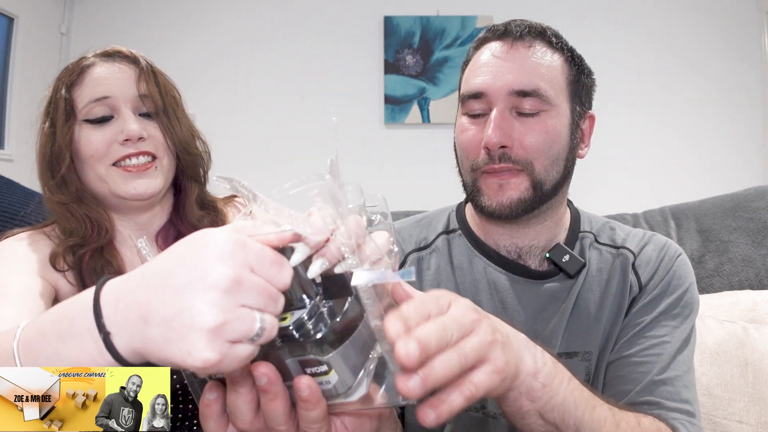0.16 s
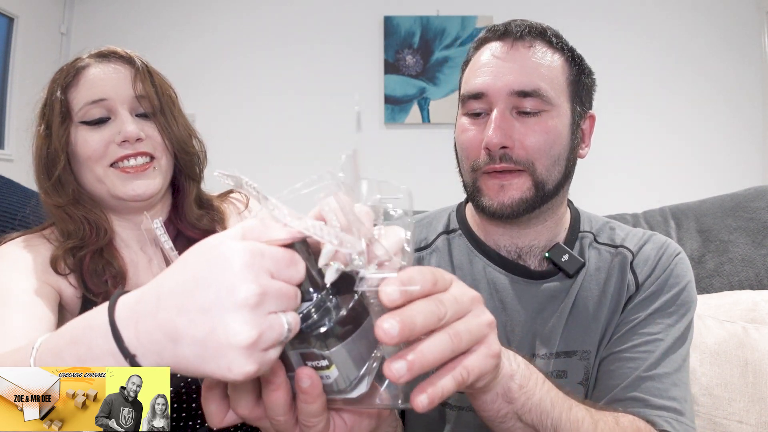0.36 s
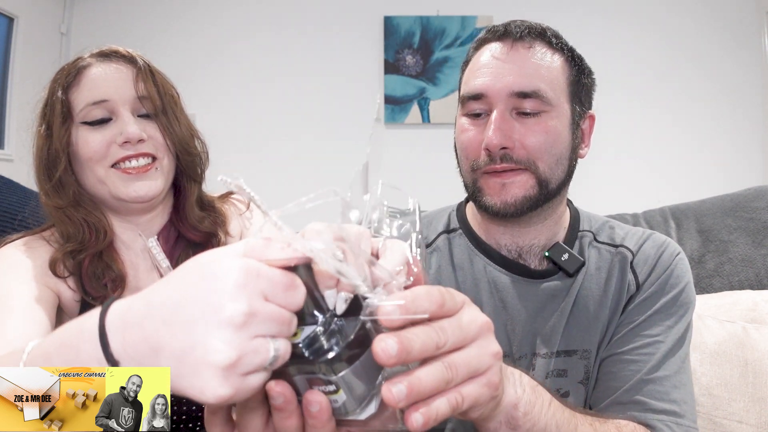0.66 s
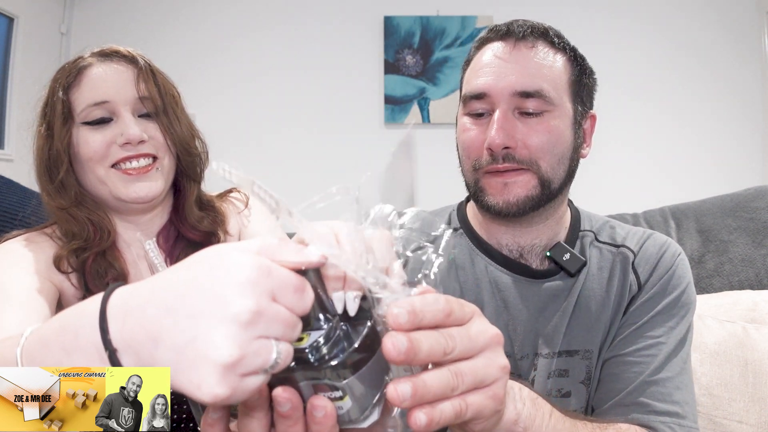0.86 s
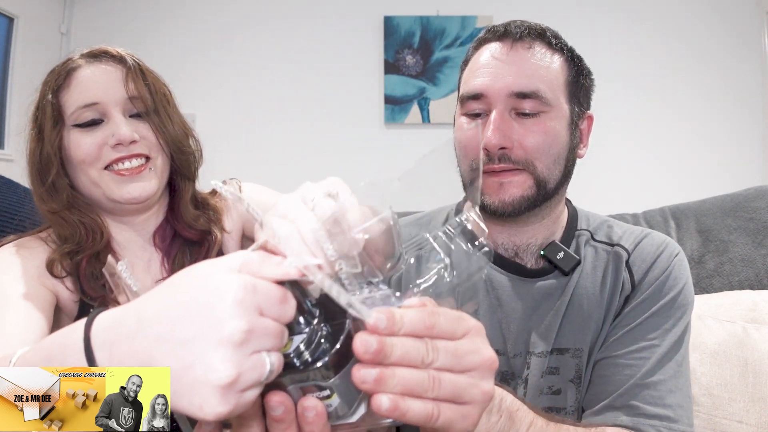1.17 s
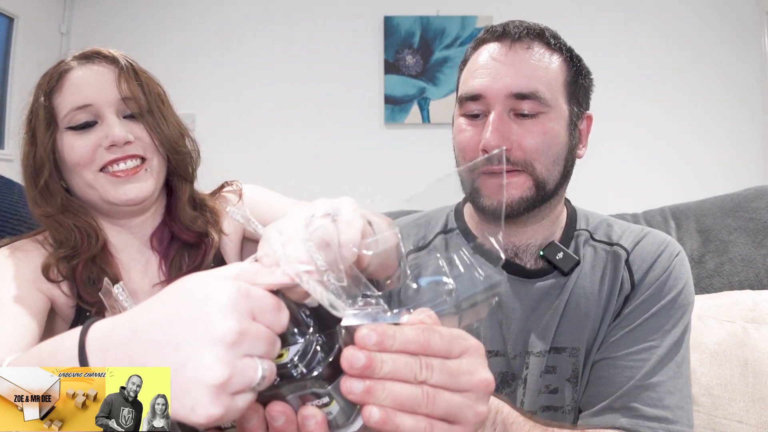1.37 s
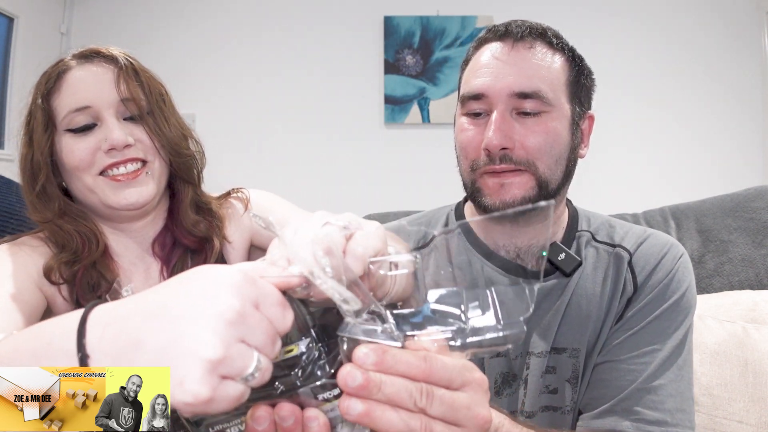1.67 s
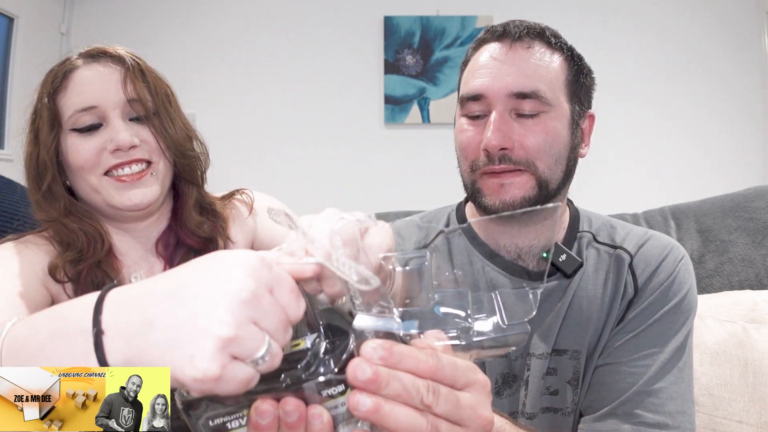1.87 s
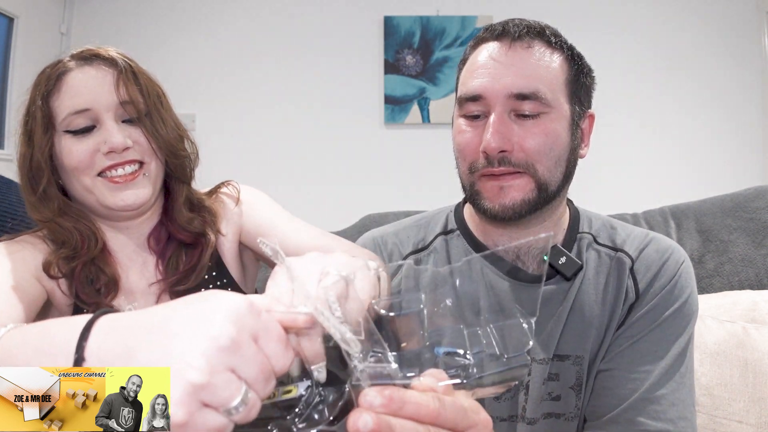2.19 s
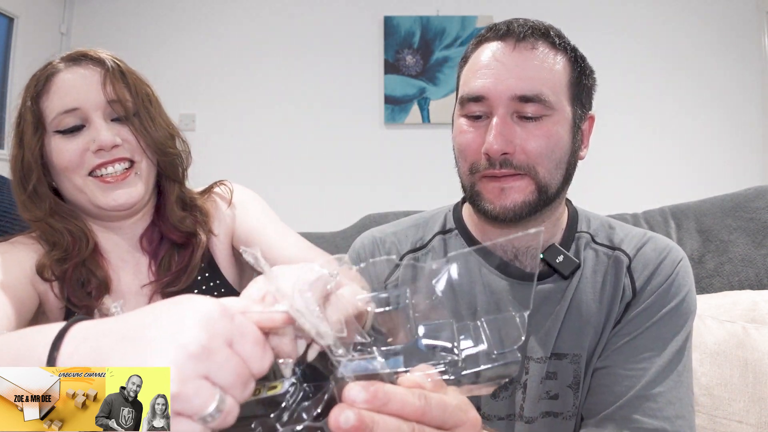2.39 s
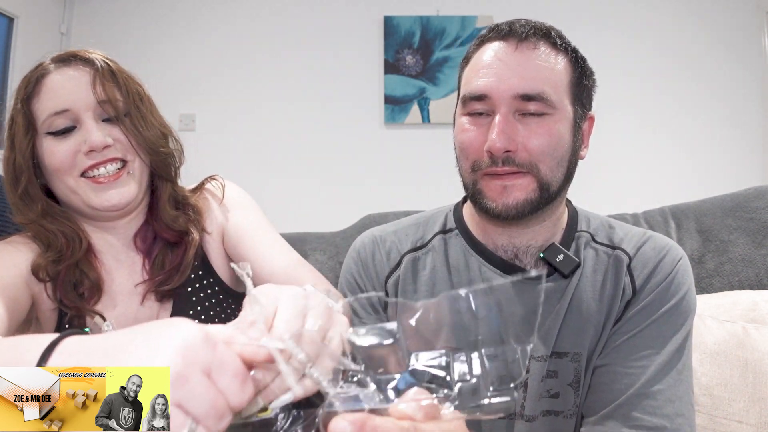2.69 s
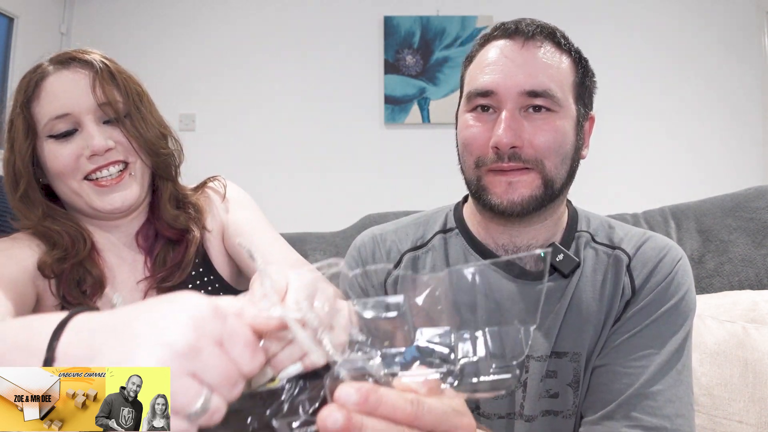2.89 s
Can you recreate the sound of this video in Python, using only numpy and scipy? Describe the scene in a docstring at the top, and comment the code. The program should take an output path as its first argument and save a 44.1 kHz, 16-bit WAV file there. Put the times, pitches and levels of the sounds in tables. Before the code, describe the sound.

Stiff plastic packaging crinkles and snaps as hands pull it apart, close by in a quiet room. Light snaps start it, with a short crumple at 0.4 seconds and a louder one with a dull bump at 0.9. After a lull, dense crackling runs from 1.5 to 1.8 seconds. The sharpest crack comes at 2.3, followed by scattered snaps, a strong one at 2.7, thinning out by 3 seconds.

```python
"""A living room: hands pull a stiff clear plastic blister pack apart, close to a microphone.
Bent panels buckle and release their elastic energy as single dry snaps, or as short crumples of dense
tiny cracks. Fine crackle and sharp ticks run on between, and the hands bump the pack with dull thuds.
Each crack sets the thin shell ringing faintly in its modes, and the quiet room reverberates."""
import sys
import numpy as np
from scipy import signal
from scipy.fft import rfft, irfft, next_fast_len
from scipy.io import wavfile
from scipy.ndimage import map_coordinates

SR = 44100
rng = np.random.default_rng(int(sys.argv[2]) if len(sys.argv) > 2 else 0)


def persist_wave(psi):
    """Save psi, clipped to +-1, as 16-bit WAV."""
    counts = np.round(np.clip(psi, -1, 1) * 32767).astype(np.int16)
    wavfile.write(sys.argv[1], SR, np.atleast_2d(counts).T)


N = 134505

# Levels are relative within each table.
# fine crackle under the bending: time_s, level_db
CRACKLE_ENVELOPE = [(0, -45.5), (.15, -47.5), (.38, -35), (.52, -52), (0.629, -62), (0.709, -33.5),
                    (.85, -52), (1.05, -50), (1.21, -59), (1.3, -43.5), (1.42, -47), (1.54, -35.5),
                    (1.82, -36.5), (1.88, -73), (1.943, -34), (2.07, -60), (2.18, -46), (2.29, -29.5),
                    (2.42, -33), (2.58, -71), (2.919, -45.5), (3.05, -47)]
# background noise of the quiet room: frequency_hz, level_db
AIR_SPECTRUM = [(50, -42), (90, 16), (200, 10.5), (1000, -4), (4000, -35), (15000, -62)]
# modes of the shell: frequency_hz, level_db
SHELL_MODES = [(440, -9), (698, 1.5), (785, 5.5), (857, 1), (1010, -9.5), (1222, 5), (1324, 6), (1946, 3.5),
               (2288, 4), (2805, 2), (3111, 0.5)]
# reverberation time of the room: frequency_hz, t60_s
ROOM_DECAY = [(400, 0.2), (1000, 0.36), (3000, 0.22), (15000, 0.15)]
# spectrum of the reflections: frequency_hz, level_db
ROOM_SPECTRUM = [(100, -3.5), (400, 3.5), (1000, -6), (3000, 0), (7000, 4), (15000, -1.5)]
# sharp creases: start_s, level_db
CREASE_TICKS = [(0.044, -43), (0.1, -40), (0.131, -44), (0.743, -45.5), (0.766, -47), (1.09, -47.5),
                (1.408, -50.5), (1.446, -51), (1.494, -36), (1.658, -46)]
# panels buckling: start_s, level_db, pitch_hz, high_edge_hz, tick_db
PANEL_SNAPS = [(0.1447, -33, 1410, 5350, -63), (0.1681, -28, 1400, 5360, -44.5),
               (0.2007, -26.5, 870, 1770, -38), (0.2312, -27, 1330, 3240, -53),
               (0.4059, -20.5, 3130, 3850, -44), (0.513, -22, 2160, 4860, -41),
               (0.5482, -32.5, 2430, 3120, -42.5), (0.6058, -28.5, 1310, 4200, -43.5),
               (0.6665, -25.5, 1270, 4560, -48), (0.7239, -14.5, 1400, 1620, -62),
               (0.815, -30, 860, 1770, -63), (0.8333, -26, 490, 3140, -41.5), (0.887, -11, 1030, 1930, -37),
               (0.8939, -17.5, 965, 2750, -34), (0.9097, -13.5, 1180, 3980, -32.5),
               (1.1966, -40, 1170, 5060, -60), (1.2603, -27.5, 2250, 3900, -58),
               (1.298, -31, 423, 2580, -40.5), (1.5125, -16, 1410, 2030, -31.5),
               (1.519, -28, 750, 2580, -53), (1.5465, -21, 326, 2850, -53), (1.577, -28, 420, 3280, -35),
               (1.6205, -21, 437, 1470, -33), (1.6484, -32.5, 1460, 5970, -44),
               (1.6681, -28, 1680, 5900, -34.5), (1.7186, -15.5, 2150, 2420, -31),
               (1.7474, -23.5, 455, 8600, -33.5), (1.7578, -18, 465, 2080, -40),
               (1.7765, -25.5, 1050, 2980, -39), (1.8056, -16.5, 1020, 2240, -32.5),
               (1.9055, -27, 880, 2140, -50.5), (1.951, -41, 805, 2790, -42.5),
               (2.011, -34, 1530, 6750, -34), (2.133, -32, 393, 545, -54), (2.2046, -31.5, 2630, 8300, -42),
               (2.3324, -5.5, 2560, 3350, -21.5), (2.345, -22.5, 1490, 3430, -38),
               (2.4091, -21, 940, 3440, -38), (2.4276, -24.5, 960, 3700, -48),
               (2.4505, -17.5, 633, 915, -45), (2.5368, -17, 756, 1800, -39),
               (2.597, -29.5, 960, 1980, -46), (2.6725, -27, 4350, 5460, -37.5),
               (2.6947, -11, 925, 2240, -35), (2.7727, -18.5, 930, 1590, -36.5),
               (2.9029, -30, 756, 760, -49)]
# runs of tiny cracks: peak_s, rise_s, fall_s, level_db, low_edge_hz, pitch_hz, high_edge_hz, tick_db
FOLD_CRUMPLES = [(0.408, 0.018, 0.066, -16.5, 840, 1060, 3500, -58),
                 (0.728, 0.015, 0.014, -19.5, 575, 1190, 1410, -68),
                 (0.908, 0.037, 0.078, -22.5, 606, 1200, 1930, -43),
                 (0.926, 0.066, 0.08, -28, 2490, 2750, 2900, -56),
                 (1.106, 0.015, 0.015, -38.5, 3170, 3970, 4430, -65),
                 (1.254, 0.025, 0.053, -33.5, 1060, 2400, 5600, -40.5),
                 (1.487, 0.019, 0.051, -23, 1160, 1950, 4900, -45),
                 (1.588, 0.0081, 0.039, -21.5, 795, 1380, 2870, -33.5),
                 (1.735, 0.02, 0.1, -41, 347, 1010, 2400, -61),
                 (2.011, 0.036, 0.076, -35.5, 1280, 1590, 5700, -37),
                 (2.33, 0.066, 0.036, -23.5, 470, 1260, 2540, -34),
                 (2.353, 0.0072, 0.1, -28, 890, 2280, 3430, -42.5),
                 (2.517, 0.024, 0.063, -33.5, 1300, 3050, 6100, -29)]
# soft pushes of the hands: start_s, level_db
HAND_BUMPS = [(0.208, -46), (0.719, -37.5), (0.886, -30), (1.576, -41.5), (2.698, -52)]
# microphone response: frequency_hz, gain_db
MIC_RESPONSE = [(30, -23), (65, -6), (200, 3.5), (450, 2), (850, 1), (2900, 1.5), (4000, -0.5), (5200, 2.5),
                (7500, -4), (15000, -5.5)]

SLIPS_PER_S = 2200
SNAP_GAIN = np.sqrt(.003 * SR)  # gives one pulse the energy of 3 ms of sound at its level


def amp(db):
    """Amplitude grows tenfold with every 20 dB."""
    return 10 ** (np.asarray(db) / 20)


def unit(x):
    """Normalisation to an rms of 1."""
    return x / np.sqrt(np.mean(x ** 2) + 1e-20)


def along(points, hz):
    """Interpolation of (frequency_hz, value) points on a logarithmic frequency axis."""
    freqs, values = np.transpose(points)
    return np.interp(np.log(hz + 1), np.log(freqs), values)


def filtered(x, response):
    """Linear filtering: the spectrum is multiplied by a frequency response."""
    size = next_fast_len(N + SR // 2)
    return irfft(rfft(x, size) * response(np.fft.rfftfreq(size, 1 / SR)), size)[:N]


def add(track, start_s, sound):
    """Superposition: a sound adds to the track from its start time."""
    start = int(np.clip(round(start_s * SR), 0, N))
    track[start:start + len(sound)] += sound[:N - start]


def swell(t, rise_s, fall_s):
    """Exponential growth and decay about t = 0: 20 dB up per rise_s, 20 dB down per fall_s."""
    return amp(-20 * np.maximum(-t / rise_s, t / fall_s))


def slips(per_s, scatter_db=6):
    """A Poisson process: independent impulses of uneven size, rms 1."""
    sizes = amp(scatter_db * rng.standard_normal(N).clip(-2, 2)) * rng.choice([-1, 1], N)
    return unit(sizes * (rng.random(N) < per_s / SR))


def crack(db, pitch_hz, high_hz, tick_db, edge_hz=0, size=2048):
    """Impulse response of a buckling panel: a resonant band and a tick, dispersed as bending waves."""
    hz = np.fft.rfftfreq(size, 1 / SR) + 1
    low_hz = max(edge_hz, 337 * (pitch_hz / 1000) ** .4)  # small panels radiate little bass
    mode_axis = np.sqrt(hz / hz[-1]) * 44
    lesser_modes = amp(3.5 * map_coordinates(rng.standard_normal(48).clip(-1.5, 1.5), [mode_axis]))
    travel_s = .003015 * map_coordinates(rng.random(48), [mode_axis], order=1)
    delay_s = travel_s * hz / (hz + low_hz) / (1 + (hz / 7560) ** 2)  # the fastest waves arrive together
    q = 3.17 * np.sqrt(pitch_hz / 1000)
    resonance = 1 + (amp(10.5) - 1) / (1 + (q * (hz / pitch_hz - pitch_hz / hz)) ** 2)
    panel_band = ((1 + (low_hz / hz) ** 5.88) * (1 + (hz / high_hz) ** 8.07)) ** -.5
    tick_band = ((1 + (1940 / hz) ** 4) * (1 + (hz / 5800) ** 2)) ** -.5
    body = amp(db) * unit(lesser_modes * resonance * panel_band)
    tick = amp(tick_db + 5) * unit(lesser_modes * tick_band)
    # folding the cepstrum makes the pulse causal, with minimum phase
    cepstrum = irfft(np.log(np.hypot(body, tick) + 1e-6))
    cepstrum[1:size // 2] *= 2
    cepstrum[size // 2 + 1:] = 0
    phase_lag = 2 * np.pi * np.cumsum(delay_s) * SR / size
    return irfft(np.exp(rfft(cepstrum) - 1j * phase_lag))


def crackle(creases_per_s=190):
    """Small creases buckle, each at its own pitch, over the faint friction of sliding sheets."""
    creases = np.zeros(N)
    draws = rng.standard_normal((1000, 3)).clip(-2, 2)
    times = np.cumsum(rng.gamma(2, .5, len(draws))) / creases_per_s
    for start_s, (size, octaves, sharpness) in zip(times[times < N / SR], draws * [1, .5, 1]):
        db, shift = 6.5 * min(size, 1), 2 ** octaves
        pulse = crack(db, pitch_hz=1286 * shift, high_hz=2690 * shift, tick_db=db - 16 + 3 * sharpness)
        add(creases, start_s, pulse)
    rub = signal.oaconvolve(slips(SLIPS_PER_S), crack(0, pitch_hz=773, high_hz=2090, tick_db=-31))[:N]
    envelope_db = np.interp(np.arange(N) / SR, *np.transpose(CRACKLE_ENVELOPE))
    return amp(envelope_db - 6) * (unit(creases) + amp(-10) * unit(rub))


def room_air():
    """The noise floor of the room: steady random sound with most of its power in the bass."""
    return amp(-69) * unit(filtered(rng.standard_normal(N), lambda hz: amp(along(AIR_SPECTRUM, hz))))


def shell_ring(t60_s=.14):
    """Damped free vibration of the shell, its modes slightly shifted and reweighted as it bends."""
    t = np.arange(SR // 3) / SR
    ring = np.zeros(len(t))
    for hz, db in SHELL_MODES:
        gain = amp(db + rng.normal(0, 1.2))
        bent_hz = hz * (1 + rng.normal(0, .016))
        ring += gain * np.sin(2 * np.pi * (bent_hz * t + rng.random()))
    ring *= amp(-60 * t / t60_s)
    return amp(-17) * ring / np.linalg.norm(ring)


def room_tail(build_s=.006):
    """Reverberation: diffuse reflections build up quickly and each frequency decays at its own rate."""
    hz, t, spectra = signal.stft(rng.standard_normal(SR // 3), SR, nperseg=256)
    level_db = along(ROOM_SPECTRUM, hz)[:, None] - 60 * t / along(ROOM_DECAY, hz)[:, None]
    tail = signal.istft(spectra * amp(level_db), SR, nperseg=256)[1]
    tail *= 1 - np.exp(-(np.arange(len(tail)) / SR / build_s) ** 2)
    return amp(-10.5) * tail / np.linalg.norm(tail)


def ticks():
    """Small sources radiate mainly treble: sharp creases tick without moving a panel."""
    out = np.zeros(N)
    for start_s, db in CREASE_TICKS:
        add(out, start_s, crack(db, pitch_hz=7500, high_hz=15000, tick_db=db))
    return SNAP_GAIN * out


def snaps(lead_s=.0006):
    """Snap-through buckling: single panels flip over amid a brief chatter of smaller cracks."""
    out, chatter = np.zeros(N), slips(SLIPS_PER_S)
    t = np.arange(SR // 10) / SR - .02
    burst = amp(-14.5) * swell(t, rise_s=.0082, fall_s=.011)
    for start_s, db, pitch_hz, high_hz, tick_db in PANEL_SNAPS:
        add(out, start_s - lead_s, SNAP_GAIN * crack(db, pitch_hz, high_hz, tick_db))
        impulses = burst * np.roll(chatter, -int(start_s * SR))[:len(t)]
        brighter_crack = crack(db, pitch_hz, high_hz, tick_db + 10)
        add(out, start_s + t[0], signal.fftconvolve(impulses, brighter_crack))
    return amp(-2) * out


def bumps(band_hz=(72, 150), attack_s=.0042, t60_s=.19):
    """Soft contact excites only low frequencies: dull thuds as the whole pack shifts in the hands."""
    out, t = np.zeros(N), np.arange(SR // 2) / SR
    band = signal.butter(2, band_hz, "band", fs=SR, output="sos")
    envelope = amp(-60 * t / t60_s) * (1 - np.exp(-t / attack_s))
    for start_s, db in HAND_BUMPS:
        thud = unit(signal.sosfilt(band, rng.standard_normal(SR))[-len(t):])
        add(out, start_s, amp(db) * envelope * thud)
    return out


def crumples(panels=3, spread_octaves=.32):
    """A buckling cascade: as a fold runs through the sheet, cracks from adjacent panels swell and fade."""
    out, t = np.zeros(N), np.arange(N) / SR
    for peak_s, rise_s, fall_s, db, low_hz, pitch_hz, high_hz, tick_db in FOLD_CRUMPLES:
        envelope = swell(t - peak_s, rise_s, fall_s)
        for shift in 2 ** np.linspace(-spread_octaves, spread_octaves, panels):
            impulses = envelope * slips(SLIPS_PER_S / panels)
            pulse = crack(db, pitch_hz * shift, high_hz, tick_db, edge_hz=low_hz)
            out += signal.oaconvolve(impulses, pulse)[:N]
    return amp(-2) * out / np.sqrt(panels)


def scene():
    """Time-varying convolution: the moving pack excites shell and room differently every 0.1 s."""
    cracks = snaps() + ticks() + crumples() + crackle()
    out = cracks + bumps() + room_air()
    for start in range(0, N, SR // 10):
        excitation = cracks[start:start + SR // 10]
        add(out, start / SR, signal.fftconvolve(excitation, shell_ring()))
        add(out, start / SR, signal.fftconvolve(excitation, room_tail()))
    return out[None]


def record(dry, top_hz=15900):
    """Transduction: the microphone colours the sound, which is clipped at full scale and band-limited."""
    coloured = filtered(dry[0], lambda hz: amp(along(MIC_RESPONSE, hz)))
    return filtered(np.clip(coloured, -1, 1), lambda hz: hz < top_hz)[None]


dry = scene()
out = record(dry)
persist_wave(out)
```